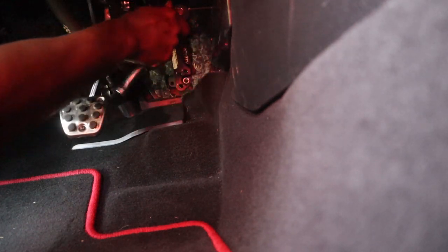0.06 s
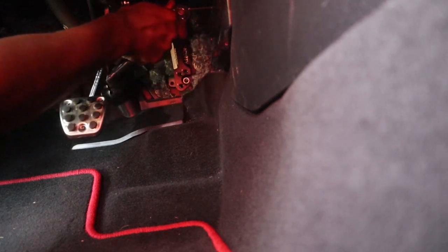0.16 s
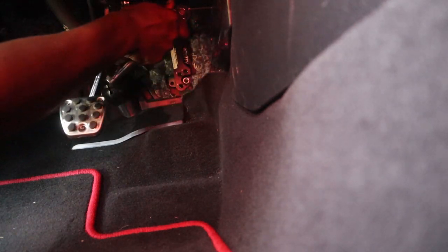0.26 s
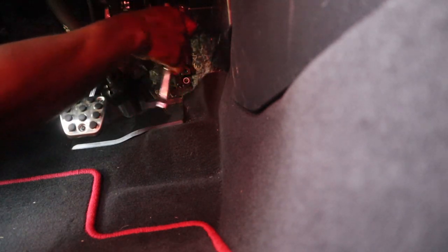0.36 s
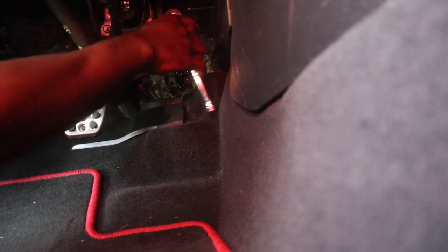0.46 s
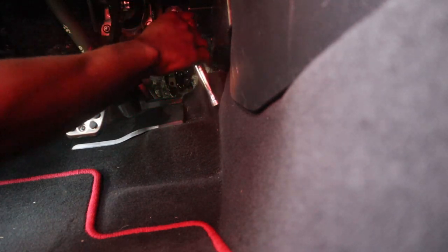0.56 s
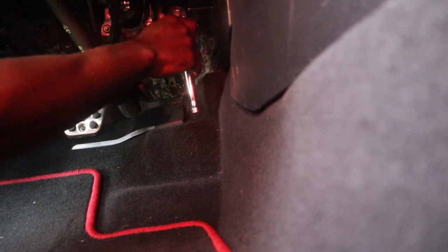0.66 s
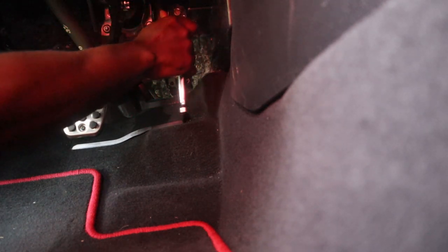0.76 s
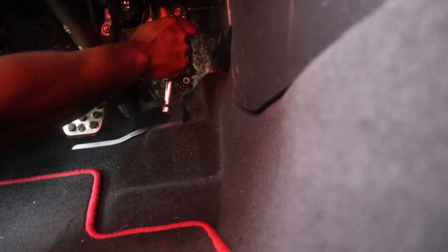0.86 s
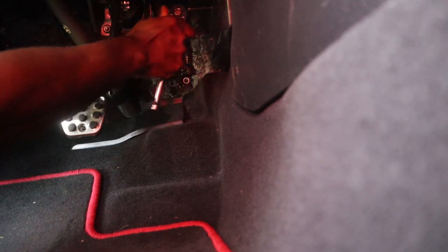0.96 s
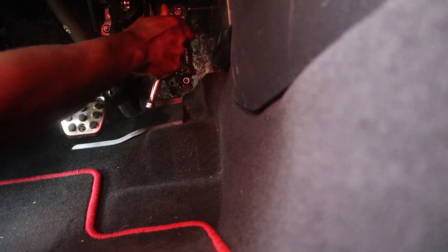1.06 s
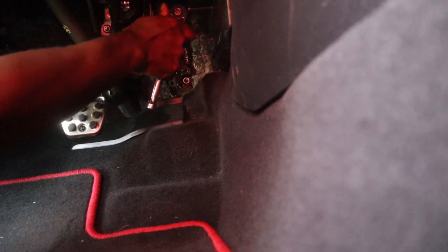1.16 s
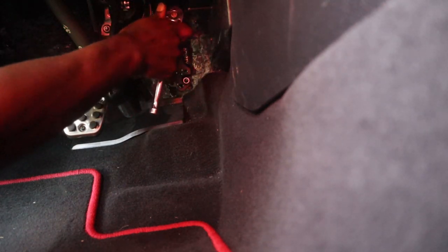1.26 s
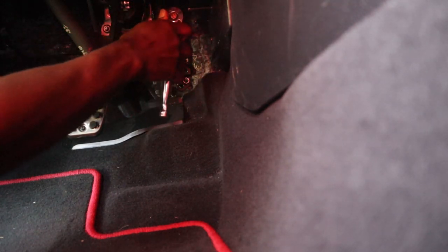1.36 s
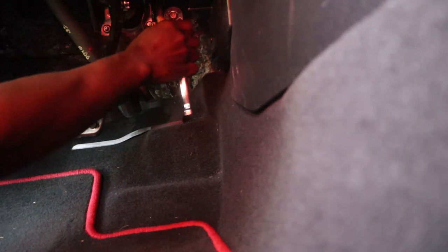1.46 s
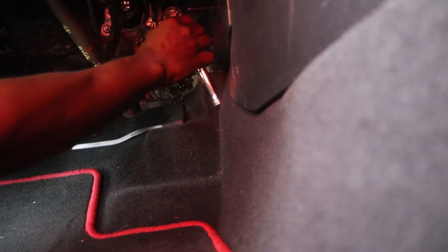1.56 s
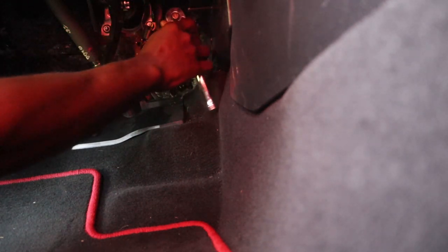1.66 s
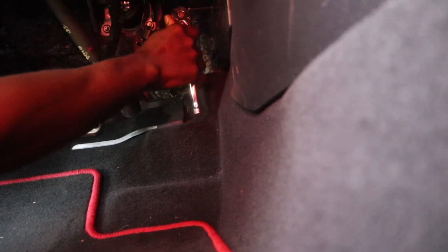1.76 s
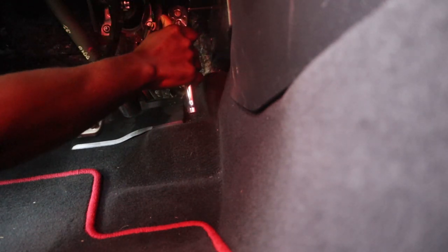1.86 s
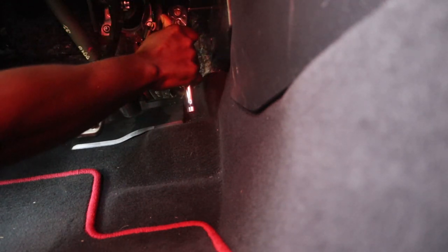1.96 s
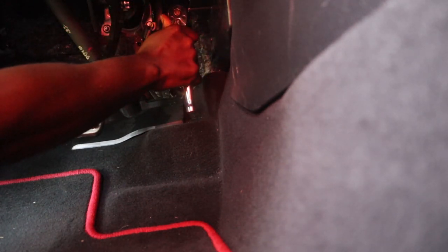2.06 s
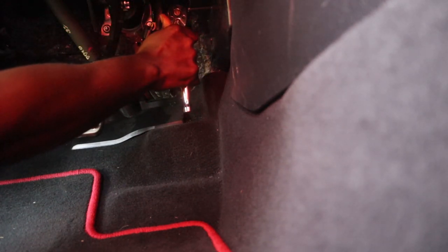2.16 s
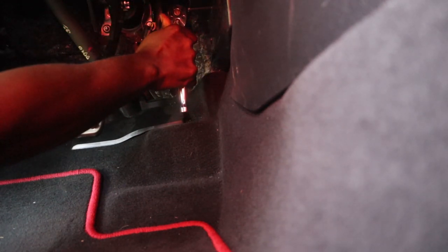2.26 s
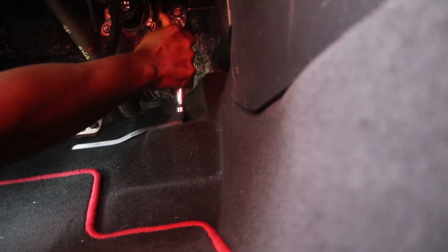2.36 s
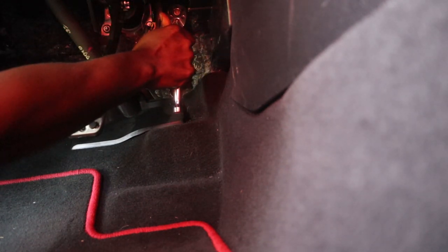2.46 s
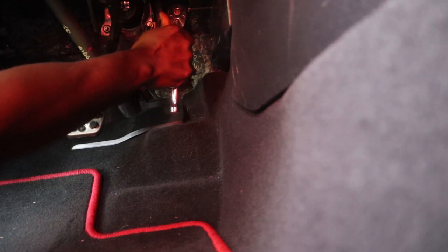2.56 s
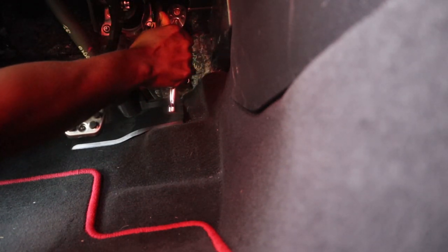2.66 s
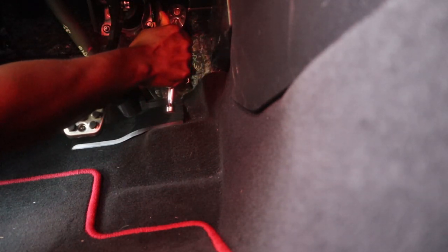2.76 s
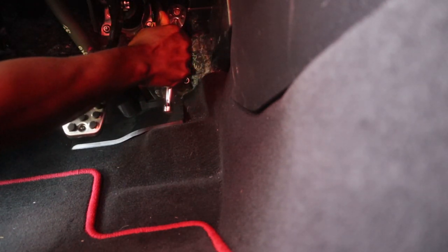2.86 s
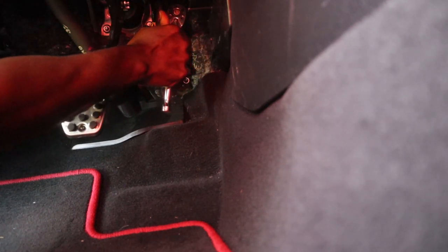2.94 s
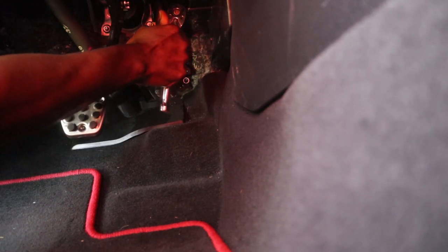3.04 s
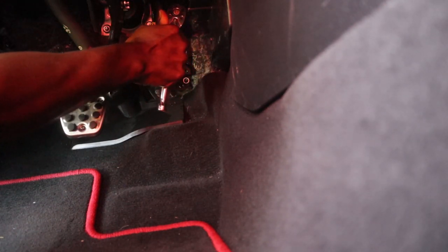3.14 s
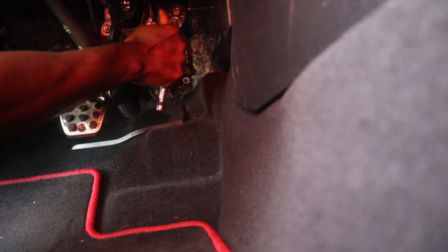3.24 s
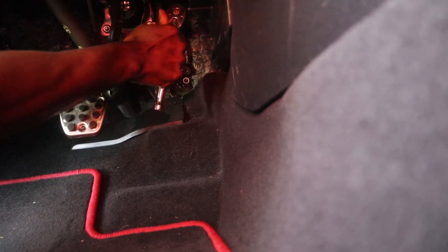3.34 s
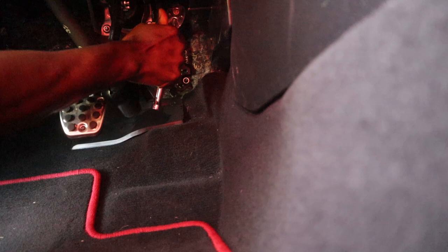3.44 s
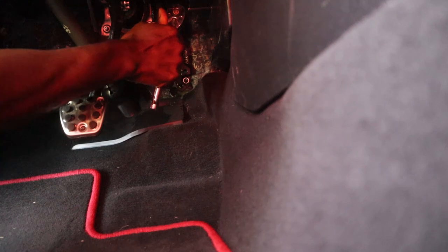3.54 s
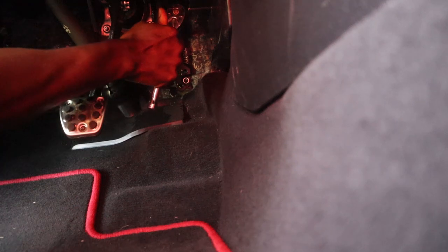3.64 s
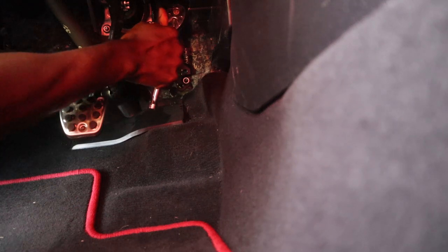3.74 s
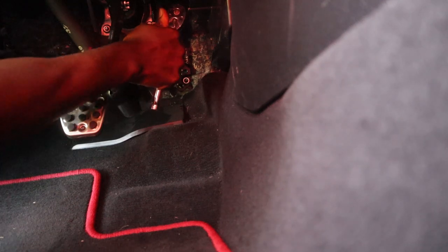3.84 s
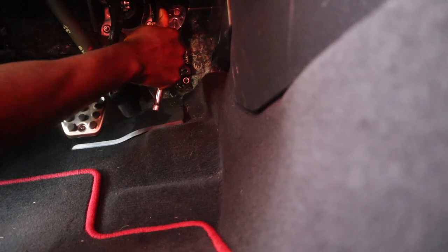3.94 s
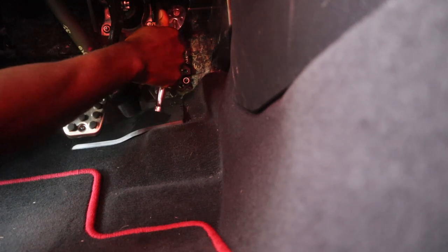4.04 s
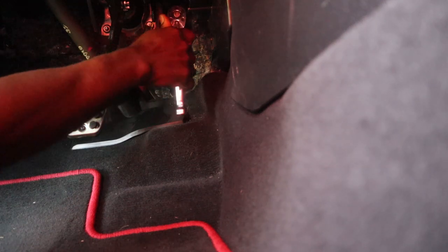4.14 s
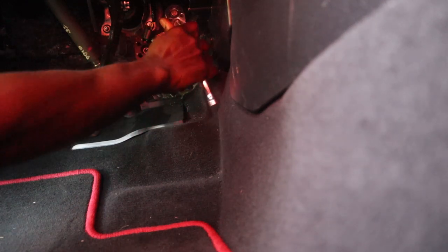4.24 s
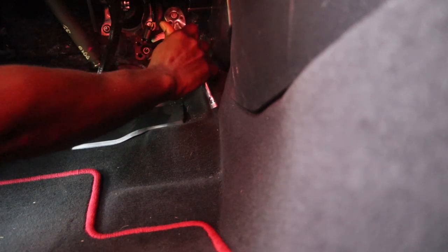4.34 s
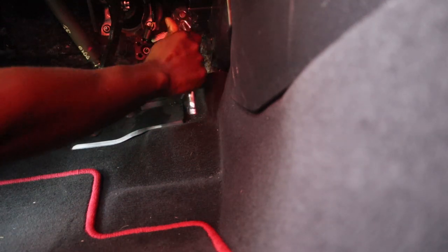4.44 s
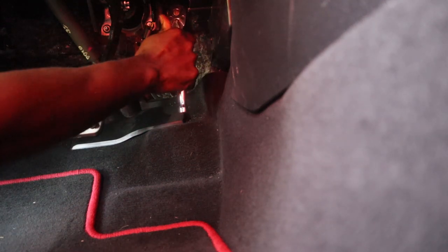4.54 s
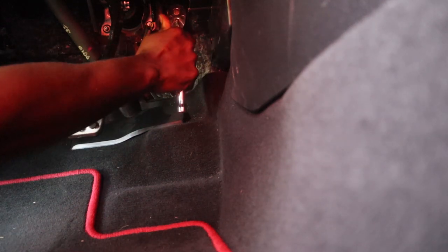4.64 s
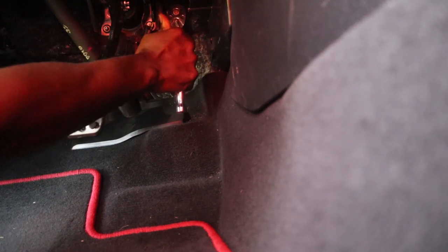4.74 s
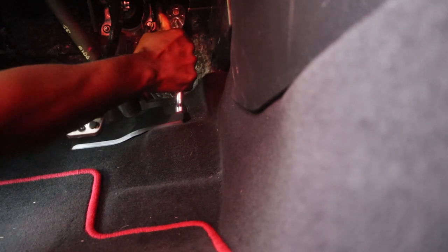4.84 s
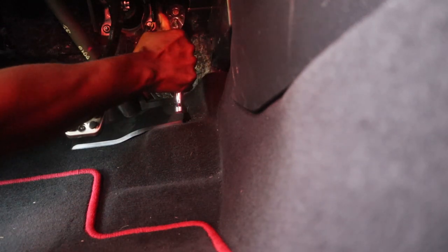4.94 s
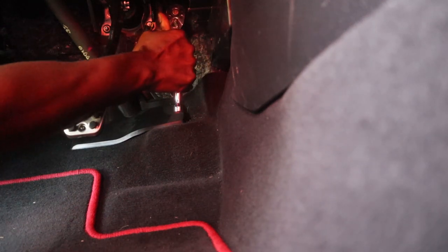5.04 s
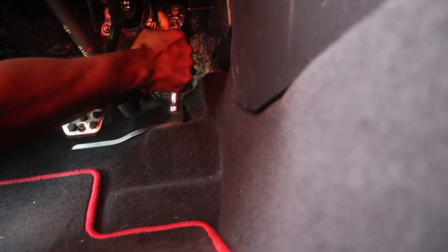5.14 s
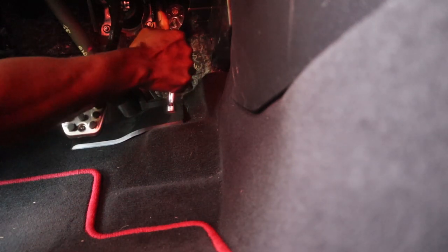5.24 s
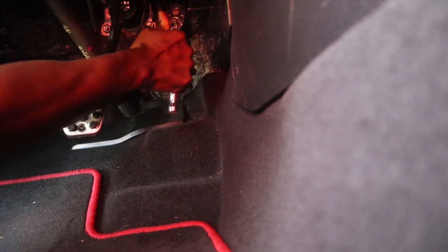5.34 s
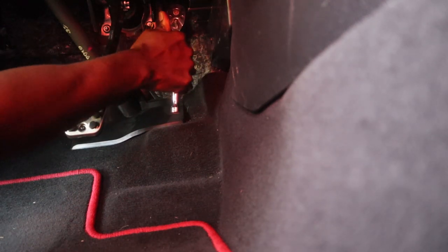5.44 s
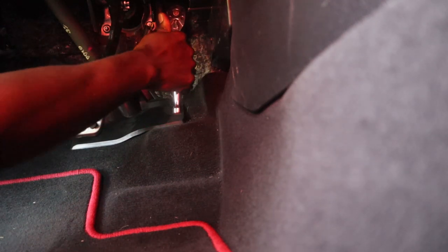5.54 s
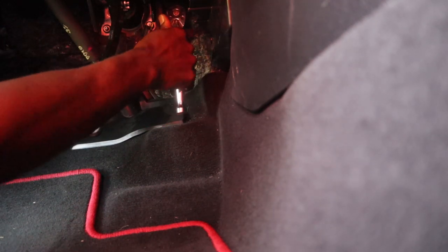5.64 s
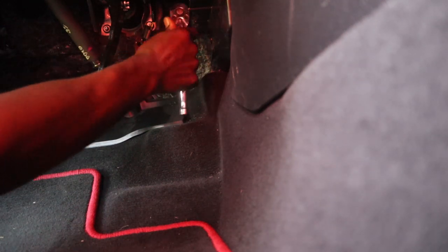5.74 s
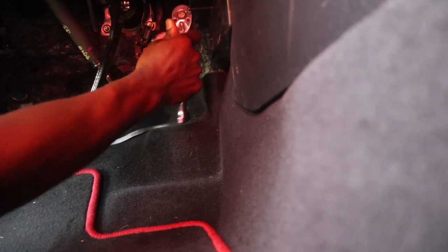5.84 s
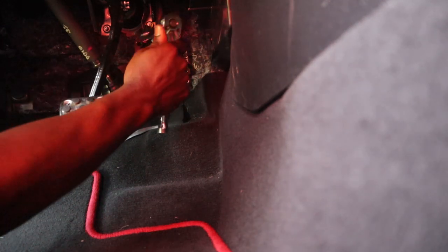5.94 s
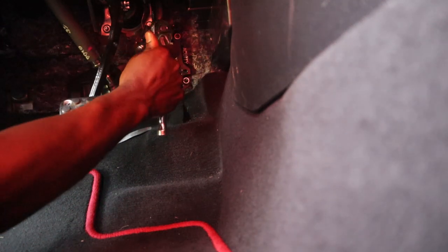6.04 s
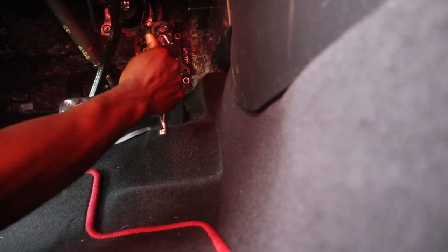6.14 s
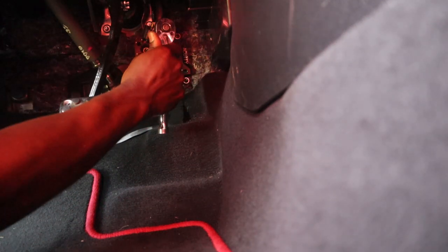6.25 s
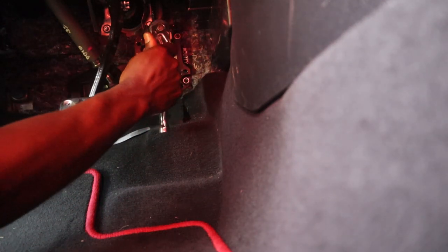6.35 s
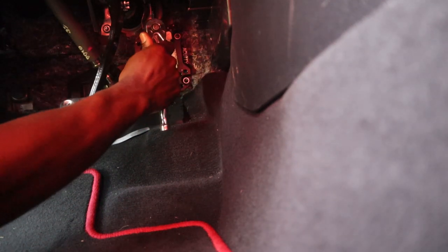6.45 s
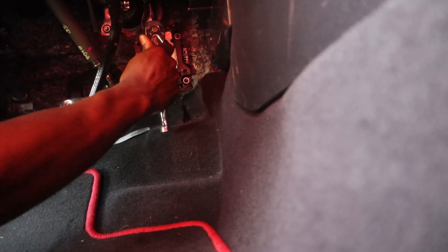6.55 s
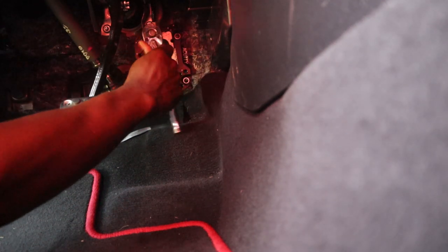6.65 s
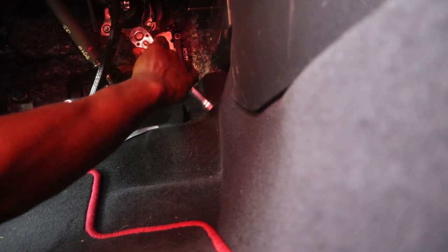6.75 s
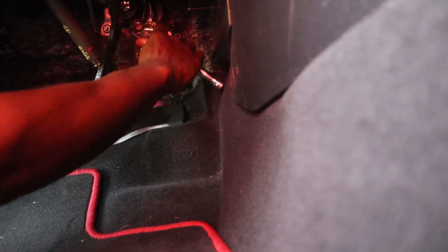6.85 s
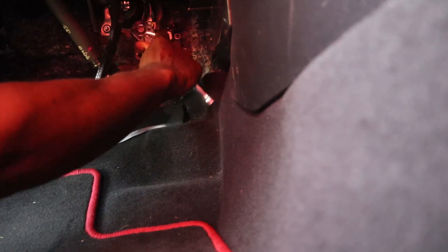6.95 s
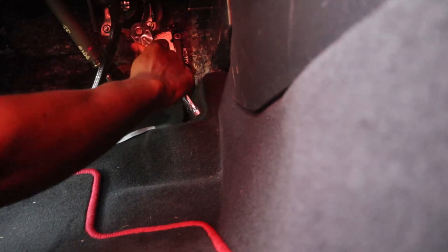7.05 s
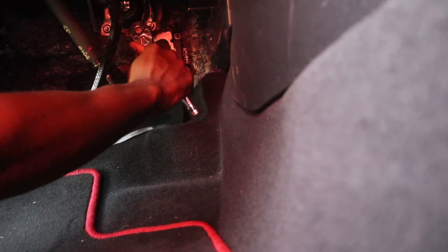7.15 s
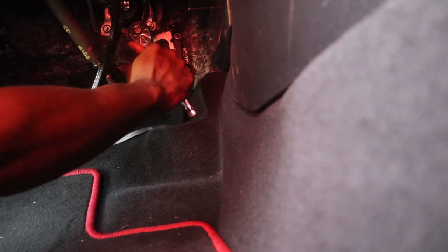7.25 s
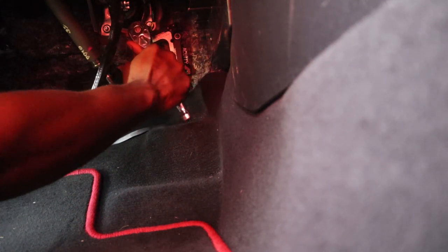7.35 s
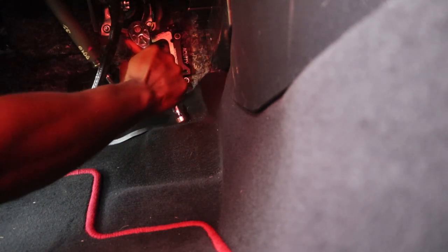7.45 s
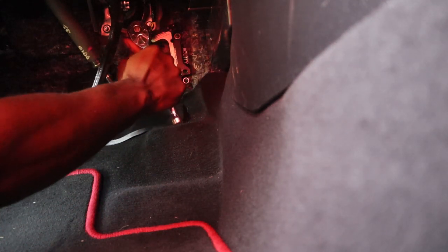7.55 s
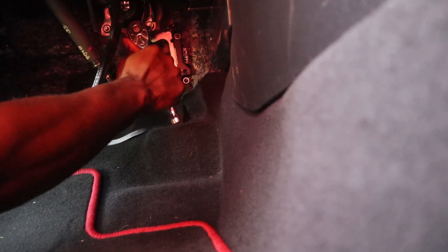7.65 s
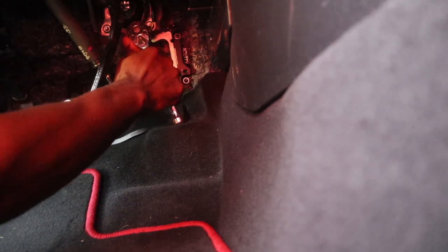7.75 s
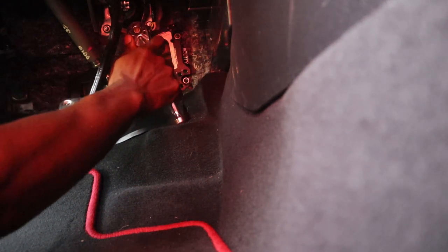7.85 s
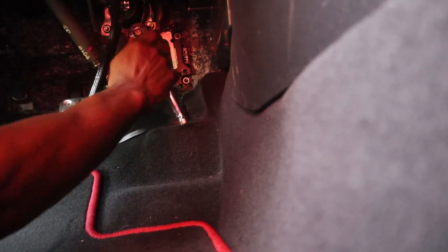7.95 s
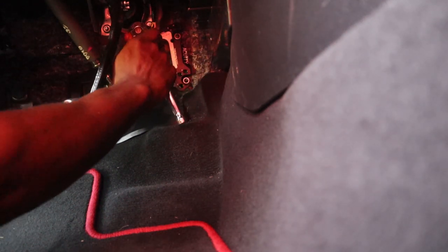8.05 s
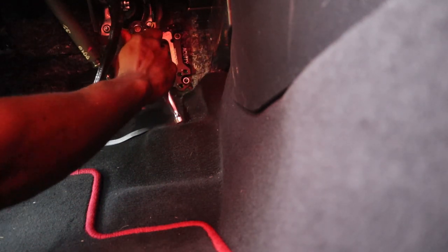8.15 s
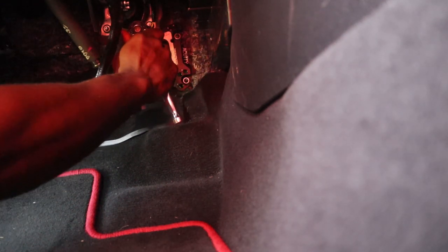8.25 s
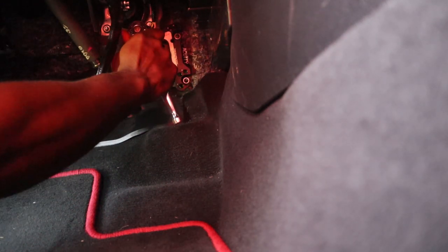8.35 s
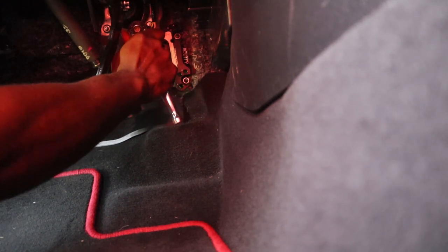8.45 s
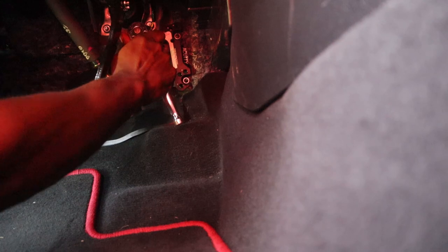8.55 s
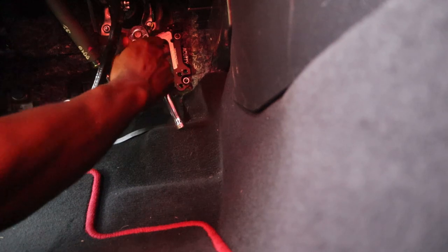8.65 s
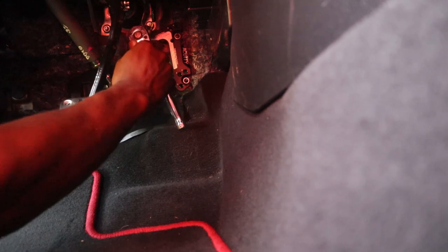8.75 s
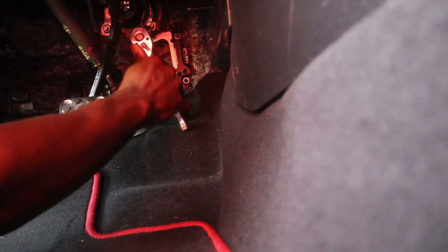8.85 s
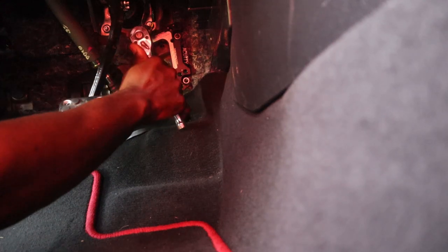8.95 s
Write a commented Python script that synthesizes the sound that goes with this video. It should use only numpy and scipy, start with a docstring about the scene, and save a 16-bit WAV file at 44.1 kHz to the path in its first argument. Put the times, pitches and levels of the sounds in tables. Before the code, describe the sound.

A steel ratchet wrench works a screw in a car footwell, heard close in wide stereo. After an opening bump, a quick run of bright clicks comes at about 0.5 seconds, among socket clanks, hollow, slightly creaky trim knocks and low floor thumps. Another run with knocks follows at 1.6. From 2 to 4 seconds there is only faint sleeve rustle and a hand sliding on the grip. The socket grinds briefly at 4, then the ratchet clicks at 4.3, followed by a cluster of knocks. A few clicks and a heavy thump land near 5.9. Loud knocks and clanks come between 6.6 and 6.9, with a few more clicks. Lighter bumps, rustles and small plastic ticks continue to about 9 seconds. Low, distant traffic rumbles softly throughout, joined by a faint engine hum from around 2 seconds.

```python
"""A steel ratchet wrench works a screw in a car footwell, heard close in widened stereo.
Its pawl clicks over the teeth in quick runs and its socket clanks; each contact rings the steel parts.
Hand and handle knock and creak the trim, the arm thumps the floor pan, and a plastic clip ticks.
Friction adds grain: the hand slides on the grip, a sleeve rustles, the socket grinds on the screw.
Far traffic and one engine hum through the body shell."""
import sys
import numpy as np
from scipy import signal
from scipy.fft import rfft, irfft, next_fast_len
from scipy.io import wavfile
from scipy.ndimage import map_coordinates

SR = 44100
rng = np.random.default_rng(int(sys.argv[2]) if len(sys.argv) > 2 else 0)


def store_pcm(level_fs):
    """Save levels as 16-bit WAV."""
    pcm = np.round(np.clip(level_fs, -1, 1) * 32767).astype(np.int16)
    wavfile.write(sys.argv[1], SR, np.atleast_2d(pcm).T)


N = 396900


def amp(db):
    return 10 ** (np.asarray(db) / 20)


def unit(x):
    return x / np.sqrt(np.mean(x ** 2) + 1e-20)


def along(points, hz):
    """Read an EQ curve of (Hz, dB) points on a log frequency axis."""
    f, db = np.transpose(points)
    return np.interp(np.log(hz + 1), np.log(f + 1), db)


def curves(rows):
    """One automation curve for each column after the time; -120 outside, so levels fall silent."""
    s, *columns = np.transpose(rows)
    return [np.interp(np.arange(N) / SR, s, column, -120, -120) for column in columns]


def fader(gestures):
    """The summed gain of several gestures, each drawn as (seconds, dB) points."""
    return sum(amp(curves(rows)[0]) for rows in gestures)


def wobble(rate):
    """A smooth random curve, rate knots a second."""
    return map_coordinates(rng.standard_normal(int(N * rate / SR) + 4), [np.arange(N) * rate / SR])


def filtered(x, response):
    """Pass x through a complex frequency response."""
    size = next_fast_len(x.shape[-1] + min(x.shape[-1], SR) // 2)
    return irfft(rfft(x, size) * response(np.fft.rfftfreq(size, 1 / SR)), size)[..., :x.shape[-1]]


def modes(table, scatter_db=0, count=1, pitch=1):
    """A resonator bank's response, its strengths scattered anew for each of count blows."""
    gains = amp(scatter_db * rng.standard_normal((count, len(table))))
    pitch = np.reshape(pitch, (-1, 1))
    return lambda f: sum((-1) ** k * gains[:, k, None] * amp(db) * 1j * f * width
                         / ((hz * pitch) ** 2 - f * f + 1j * f * width)
                         for k, (hz, width, db) in enumerate(table))


def friction(colour, depth_db, rate):
    """Two channels of coloured noise, made grainy by a fast flutter in level."""
    grains = rng.standard_normal((2, N)) * amp(depth_db * wobble(rate))
    return unit(filtered(grains, colour))


def blows(s, db, table, rise, t60, broad_db, size=3072, bend=0.86, hardness=1e3,
          tilt_db=0, pitch=1, strike=0, swell=1):
    """Hits peaking at db: a strike and a swelling, dying rattle of echoes ring the modes. Two channels."""
    t = np.arange(size) / SR
    decay = amp(-60 * (t / np.reshape(t60, (-1, 1))) ** bend)  # bend under 1: fast drop, long tail
    envelope = (1 - np.exp(-t / rise)) ** swell * decay
    ring = modes(table, scatter_db=2.0, count=len(s), pitch=pitch)
    low, high = table[0][0] * 0.79, table[-1][0] * 1.02

    def body(f):
        band = 1j * f / (low + 1j * f) * high / (high + 1j * f)
        faint_modes = amp(np.reshape(broad_db, (-1, 1))) * band ** 3
        contact = (1 + 1j * f / (hardness * high)) ** -4.0  # a soft blow holds no treble
        tilt = amp(np.reshape(tilt_db, (-1, 1)) * np.log2(np.clip(f, low, high) / low))
        return (ring(f) + faint_modes) * contact * tilt

    rattle = rng.standard_normal((len(s), 2, size)).swapaxes(0, 1) * envelope
    impulse = (t == 0) * strike * np.linalg.norm(envelope, axis=-1, keepdims=True)
    hits = filtered(rattle + impulse, body)
    peaks = np.abs(signal.hilbert(hits[0])).max(axis=1)
    hits = hits * (amp(db) / peaks)[:, None]
    at = (np.round(s * SR).astype(int)[:, None] + np.arange(size)).ravel()
    return np.array([np.bincount(at, channel.ravel(), N + size)[:N] for channel in hits])


# Stereo width of close sounds, wider in the treble. Each row: frequency in Hz, side over mid in dB.
WIDTH_EQ = [(100, -36.5), (300, -20), (700, -16.5), (1200, -1), (3000, -4.5), (6000, 0), (10000, 3),
            (15000, 8)]


def widen(mid, echoes, share, lead):
    """Mid and side: the side is part the mid, lead radians ahead, and part its own echoes."""
    side = filtered(mid, lambda f: share * np.exp(1j * lead)) + np.sqrt(1 - share ** 2) * echoes
    return np.array([mid, filtered(side, lambda f: amp(along(WIDTH_EQ, f)))])


# Tone of the traffic and of the cabin air. Each row: frequency in Hz, relative level in dB.
TRAFFIC_EQ = [(8.8, -43.5), (15, -9), (59, 1.5), (126, -6), (201, -14.5), (286, -18.5), (330, -20),
              (512, -27), (610, -26.5), (726, -25.5), (865, -30), (2330, -36), (3120, -38), (11300, -56.5),
              (16000, -63.5)]
AIR_EQ = [(35, -79.5), (60, -48.5), (160, -5), (515, -3.5), (636, -3.5), (882, -3), (1550, -6.5),
          (6140, -21.5), (11800, -27), (16000, -43.5)]


def traffic_and_air():
    """The bed: far traffic rumbles through the shell in the mid, cabin air fills the side."""
    noise = rng.standard_normal((2, N))
    rumble, air = filtered(noise, lambda f: amp([along(TRAFFIC_EQ, f), along(AIR_EQ, f)]))
    return np.array([amp(-39.5 + 0.77 * wobble(4)) * unit(rumble),
                     amp(-51 + 0.6 * wobble(5)) * unit(air)])


# The floor pan's boom. Each row: frequency in Hz, bandwidth in Hz, level in dB.
FLOOR_MODES = [(62.5, 14, -2), (89, 18, 4), (126.3, 21, -8.5), (152, 30, -7.5), (224, 110, -8.5)]
# The arm landing. Each row: start in seconds, peak in dB, brightness in dB per octave.
FLOOR_THUMPS = [(0.004, -15.5, 3.5), (0.385, -18, 3.5), (0.469, -15, 11), (0.565, -19, 5.5),
                (0.614, -18, -0.5), (0.728, -10.5, -4), (0.784, -14.5, -3.5), (0.847, -25.5, -1.5),
                (1.392, -23, 0.5), (1.664, -17.5, 4), (1.8, -13.5, 9.5), (1.889, -22.5, -3),
                (4.318, -27, 5.5), (4.371, -19.5, 10), (4.521, -13.5, -1), (4.545, -20, 1),
                (4.588, -16.5, -1), (5.91, -3.5, 1.5), (5.933, -12.5, -5), (5.948, -16, 4),
                (6.009, -19.5, -22), (6.039, -28, -20), (6.101, -26, -13), (6.28, -28, -2), (6.605, -16, 6),
                (6.727, -21, -4.5), (6.836, -16, 2), (6.911, -19.5, -1.5), (7.105, -18.5, -3.5),
                (8.137, -18, 1.5), (8.19, -22.5, 6), (8.932, -27.5, 5), (8.968, -19.5, -4.5)]


def floor_thumps():
    """The floor pan answers the arm's soft blows with its low modes."""
    s, db, tilt_db = np.transpose(FLOOR_THUMPS)
    boom = blows(s, db, FLOOR_MODES, rise=0.0079, t60=0.13, broad_db=-12, size=12288,
                 hardness=6.7, tilt_db=tilt_db, strike=0.89)
    return widen(*boom, share=0.7, lead=1.2)


# A trim panel's hollow body and its edge. Each row: frequency in Hz, bandwidth in Hz, level in dB.
PANEL_MODES = [(265.5, 64, 2), (392, 72, 0.5), (494.5, 68, -0.5), (655, 58, 0.5), (765, 61, -7.5)]
EDGE_MODES = [(976, 79, -3.5), (1088, 100, -4.5), (1153.6, 33, -9.5), (1643, 82, -12)]
# Knocks on the trim. Each row: start in seconds, panel peak in dB, edge over panel in dB,
# steel clank over panel in dB, panel brightness in dB per octave.
TRIM_KNOCKS = [(0.007, -15.5, -38, -18.5, -12), (0.342, -27, -17, -31, -2.5), (0.374, -21, -29, -37, -4.5),
               (0.394, -14.5, -13, -10, -0.5), (0.406, -12.5, -8, -5.5, 3), (0.4503, -16.5, -10, 6.5, 1.5),
               (0.493, -14, -16, -24, 5), (0.513, -12.5, -16.5, -25, 2), (0.559, -7.5, -19, -14.5, -2.5),
               (0.609, -21.5, -13, -28, 4), (0.66, -20.5, -20, -32.5, -11.5), (0.701, -17.5, -8.5, -9.5, 0),
               (0.7165, -22.5, -16, -4, 2), (0.723, -10.5, -16, -10.5, -3), (0.742, -22.5, -34, -35, -8),
               (0.784, -15.5, -24.5, -36, 0.5), (1.365, -21.5, -19, -13.5, 0), (1.384, -20, -24, -27, -3.5),
               (1.405, -22.5, -5.5, -1, -0.5), (1.481, -26, -17.5, -21, -6.5),
               (1.57, -18.5, -13, -28.5, 7.5), (1.6, -17.5, -5, -26, 11.5), (1.621, -22, 0, -23, 2),
               (1.657, -20, -36, -29.5, -5), (1.743, -35.5, 5, 3, -0.5), (1.763, -11.5, -16, -8.5, 9),
               (1.773, -13.5, -1.5, -11, 3), (1.789, -9, -13, -7.5, 6.5), (1.912, -28, -23, -23, -13),
               (4.018, -18, -30, -15.5, 5.5), (4.038, -23.5, -22, -18.5, -12), (4.071, -29, -11.5, -10, 23),
               (4.134, -24, -14.5, -29.5, 10), (4.203, -22, -16, -24, -6), (4.238, -27.5, -11, -7.5, -2),
               (4.279, -19, -27, -16.5, 1.5), (4.312, -21.5, -11, -41, 1), (4.348, -12.5, -13, -39, -11.5),
               (4.363, -20, -13, -12, -2), (4.473, -32, -3, -0.5, 6), (4.49, -12, -10, -11, 7),
               (4.513, -11, -26, -6.5, 7.5), (4.523, -15.5, -2, 1, 16), (4.53, -8, -9, -8, 14.5),
               (4.536, -7, -34, -10, -7), (4.558, -15.5, -9.5, -22, 10), (4.594, -35, 1, -11, 4),
               (4.609, -19, -28, -20, -7), (5.073, -32.5, -14, -18, 7), (5.16, -28.5, -12, -13.5, 1.5),
               (5.683, -30.5, -32, -4.5, 0), (5.717, -28, -31, -18, 7), (5.779, -25.5, -10, -30, -1),
               (5.832, -13, -8, -22, 13), (5.858, -12.5, -7, -31, 3), (5.9, -14.5, 7.5, -3, -3),
               (5.913, -5, -3.5, -16, -6.5), (5.921, -23.5, -17, 2.5, -1), (5.934, -13.5, -10, 6.5, 27),
               (5.939, -4.5, -43, -39, -13), (5.958, -38, -30, 9, -3), (6.007, -46, -21, 6, -3),
               (6.521, -33, -4, -4, 10.5), (6.5604, -18.5, -3, 7.5, 14), (6.589, -7.5, -5.5, 3.5, 9),
               (6.602, -4.5, -10, -3, 8.5), (6.724, -7, -23, -11.5, 9), (6.757, -18, -17, -8, 6),
               (6.806, -19, -15, -9, 12), (6.831, -13, -20, -10, 3), (6.843, -24, -15, 1.5, -7.5),
               (6.8496, -1, -14, -2, 8.5), (6.883, -34.5, -1.5, -19.5, -3.5), (6.94, -20.5, -12, -13, 3),
               (7.007, -25, -37, -38, -3), (7.057, -22, -10, -10, -5), (7.076, -18, -16, -11.5, 0),
               (7.099, -21, -14, -9, 2), (7.152, -24.5, -14.5, -43, 11), (7.48, -37.5, -21, -27, 9),
               (7.63, -35, -18.5, -25, -3), (7.89, -33, -20, -25, 9), (8.024, -24, -11, -21, 9),
               (8.039, -22, -10.5, -20, 6), (8.08, -21, -42, -41, -1), (8.121, -15.5, -23, -17, 1),
               (8.125, -22, -5, -9, 18), (8.13, -15.5, -24, -7.5, 17), (8.151, -46, -13.5, 3, 4),
               (8.161, -19.5, -12, -13, -10), (8.175, -20, -9, -30, 2), (8.222, -29, -20.5, -25, -4),
               (8.448, -31, -15, -25, -7.5), (8.622, -33.5, -15, -6, -3), (8.722, -24, -28, -16.5, -2.5),
               (8.961, -25.5, -39, -37, -8)]


def trim_knocks():
    """Hand and wrench bump the trim: a hollow panel note with a shorter clack from its edge."""
    s, db, edge_db, _, tilt_db = np.transpose(TRIM_KNOCKS)
    panel = blows(s, db, PANEL_MODES, rise=0.00032, t60=0.12, broad_db=-19.5, size=6144,
                  hardness=2.9, tilt_db=tilt_db, strike=1.1)
    edge = blows(s, db + edge_db, EDGE_MODES, rise=0.00097, t60=0.067, broad_db=-5.5,
                 hardness=4.1, strike=0.15)
    return widen(*(panel + edge), share=0.7, lead=1.2)


# The wrench's four ringing parts. Each row: frequency in Hz, bandwidth in Hz, level in dB.
PAWL_MODES = [(7370, 110, -2), (8200, 150, -1), (8684, 150, 2.5), (9150, 340, 3), (9844, 100, 6.5),
              (11200, 260, 3.5), (11900, 580, -5), (12800, 300, -10)]
HEAD_MODES = [(4910, 78, 0.5)]
COLLAR_MODES = [(5100, 510, -1), (5705, 130, -2.5)]
HANDLE_MODES = [(2128, 81, -11), (2900, 230, -1.5), (3230, 200, -2), (3600, 89, -9.5)]
FIRM_DB = -20.5  # handle peak of a firm contact


def wrench_ring(s, pawl_db, head_db, collar_db, handle_db, decay_s, pawl_pitch=1, head_pitch=1):
    """Steel contacts ring pawl, head, collar and handle, each for its own multiple of decay_s."""
    pawl = blows(s, pawl_db, PAWL_MODES, rise=0.0019, t60=0.96 * decay_s, broad_db=4,
                 bend=0.69, pitch=pawl_pitch, swell=1.1)
    head = blows(s, head_db, HEAD_MODES, rise=0.0012, t60=0.95 * decay_s, broad_db=-20.5,
                 bend=0.76, hardness=1.6, strike=0.26, pitch=head_pitch, swell=0.83)
    collar = blows(s, collar_db, COLLAR_MODES, rise=0.001, t60=0.55 * decay_s, broad_db=-17.5,
                   bend=0.85, hardness=1.6, strike=0.32)
    haze_db = -2.5 - 0.4 * (handle_db - FIRM_DB)  # firmer contacts ring clearer
    detune = 1 + 0.012 * rng.standard_normal(len(s))  # each contact shifts the handle's pitch a little
    handle = blows(s, handle_db, HANDLE_MODES, rise=0.0013, t60=2.1 * decay_s, broad_db=haze_db,
                   bend=0.46, hardness=4, strike=0.2, pitch=detune)
    return widen(*(pawl + head + collar + handle), share=0.68, lead=1.3)


def socket_clanks():
    """The socket clanks with every knock on the trim, ringing mostly the handle."""
    s, panel_db, _, steel_db, _ = np.transpose(TRIM_KNOCKS)
    db = panel_db + steel_db
    bite_db = 0.1 * (db - FIRM_DB)  # firmer clanks shake the pawl harder
    return wrench_ring(s, pawl_db=db - 16.5 + bite_db, head_db=db - 20.5, collar_db=db - 18,
                       handle_db=db, decay_s=0.02)


def trim_creak():
    """The trim creaks as the hand loads it before a knock, as it settles, and under grinds and slides."""
    load_s, settle_s, tail_s = 0.014, 0.023, 0.19
    s, db = np.transpose(TRIM_KNOCKS)[:2, :, None]
    t = np.arange(0, N + 128, 128) / SR
    gap = np.abs(t - s)
    spread = np.exp(-gap / np.where(t < s, load_s, settle_s)) + amp(-35.5) ** 2 * np.exp(-gap / tail_s)
    power = (amp(db) ** 2 * spread).sum(axis=0)
    strain = np.interp(np.arange(N) / SR, t, np.sqrt(power) ** 0.69)  # 0.69 dB of creak per dB of knock
    gain = amp(-29.5) * strain + amp(-2) * fader(SOCKET_GRINDS) + amp(8.5) * fader(HAND_SLIDES)
    creak = gain * friction(modes(PANEL_MODES), depth_db=1.8, rate=80)
    return widen(*creak, share=0.3, lead=1.2)


# The rubbed grip's ring. Each row: frequency in Hz, bandwidth in Hz, level in dB.
GRIP_MODES = [(2370, 510, 2.5), (3060, 200, -5.5), (3720, 120, -8), (4770, 200, -10)]
# One fader move for each slide of the hand. Each row: time in seconds, level in dB.
HAND_SLIDES = [
    [(.18, -78), (.22, -59.5), (.38, -56.5), (.42, -42)],
    [(.82, -60), (.95, -60), (1.15, -61.5), (1.3, -61)],
    [(1.82, -66.5), (1.9, -52.5), (1.96, -67.5), (2.04, -51.5), (2.12, -65.5), (2.6, -67), (2.9, -67.5)],
    [(.59, -49), (.66, -57), (.8, -81)],
    [(4.12, -58), (4.2, -50), (4.37, -52), (4.47, -62)],
    [(5.67, -63), (5.75, -59), (5.83, -51)],
    [(4.62, -65), (4.85, -59), (5.1, -63)],
    [(5.98, -66), (6.2, -72), (6.5, -69)],
]


def hand_slide():
    """The hand slides along the grip and friction stirs its resonances."""
    rub = fader(HAND_SLIDES) * friction(modes(GRIP_MODES), depth_db=2.2, rate=100)
    return rub * amp([[0], [3]])  # side lifted for width


# Strokes of the sleeve. Each row: centre in seconds, peak in dB, bell-curve width in seconds.
SLEEVE_STROKES = [(0.252, -61.5, 0.035), (1.136, -60, 0.049), (2.937, -62, 0.042), (3.07, -63.5, 0.037),
                  (3.26, -53, 0.022), (3.731, -60, 0.016), (4.954, -59, 0.033), (5.289, -59.5, 0.013),
                  (5.422, -60.5, 0.033), (7.29, -53.5, 0.027), (7.546, -61, 0.022), (7.686, -61.5, 0.043),
                  (7.893, -60, 0.042), (8.545, -60.5, 0.039), (8.727, -62.5, 0.057), (8.975, -56.5, 0.035)]


def sleeve_rustle():
    """A sleeve brushes the carpet in soft swells of hiss and is never quite still."""
    t = np.arange(N) / SR
    strokes = sum(amp(db) * np.exp(-0.5 * ((t - s) / width) ** 2) for s, db, width in SLEEVE_STROKES)
    fidget = amp(-70 + 2 * wobble(8.5))
    cloth_eq = [(1000, -13.5), (2500, -1.5), (5000, -1), (8000, -14.5), (12000, -11), (14000, -30.5)]
    hiss = friction(lambda f: amp(along(cloth_eq, f)), depth_db=2.2, rate=90)
    return (strokes + fidget) * hiss * amp([[0], [6]])  # side lifted for width


# One list of clicks for each run; the last holds stray ticks of the loose pawl.
# Each row: start in seconds, pawl peak in dB.
CLICK_RUNS = [
    [(0.4049, -24), (0.4262, -20), (0.4395, -9), (0.45, -13.5), (0.4586, -13)],
    [(0.4704, -19), (0.4784, -20), (0.4883, -18.5), (0.4955, -26.5), (0.5006, -26), (0.5126, -18),
     (0.5252, -21.5), (0.5379, -19), (0.5521, -14.5), (0.5625, -19), (0.5804, -12.5)],
    [(1.5552, -9), (1.5699, -5), (1.5852, -4.5), (1.602, -4.5), (1.6188, -9.5), (1.6245, -8)],
    [(4.2757, -40), (4.2951, -9), (4.3132, -8.5), (4.3385, -7), (4.357, -8)],
    [(5.8336, -13), (5.8584, -10)],
    [(5.9332, -13.5), (5.9436, -12)],
    [(6.777, -13), (6.7935, -13), (6.8897, -19)],
    [(8.9075, -38.5)],
    [(0.6514, -46.5), (3.4032, -58), (5.684, -56), (5.772, -55), (6.0207, -52.5), (6.032, -48.5),
     (6.1483, -51.5), (6.2602, -55), (6.9114, -61), (7.0743, -48)],
]
# How the grip lets the wrench ring in each run. Each row: handle, head and collar levels in dB
# over the pawl, then pawl and head pitch as ratios.
RUN_VOICINGS = [(-5.5, -4, -13, 1.002, 1.01), (-6, -15, -8, 1.001, 0.86), (-11, -12.5, -10, 1.003, 1.035),
                (-15, -4.5, -20, .998, 1.001), (-0.5, -5, 0.5, 1, 1.01), (-17, -13, -8, 1, 0.91),
                (-5.5, -5, -27, 1.001, 1.001), (-25, -22, -8, 0.82, 1.001), (12.5, 8, -7, 1.1, 1.3)]


def pawl_clicks():
    """The pawl drops over the teeth in bright clicks, each run coloured by the hand's grip."""
    clicks = [(s, db, db + head, db + collar, db + handle, pawl_pitch, head_pitch)
              for run, (handle, head, collar, pawl_pitch, head_pitch) in zip(CLICK_RUNS, RUN_VOICINGS)
              for s, db in run]
    s, *part_levels, pawl_pitch, head_pitch = np.transpose(clicks)
    return wrench_ring(s, *part_levels, decay_s=0.025, pawl_pitch=pawl_pitch, head_pitch=head_pitch)


# Two glides of a far engine. Each row: time in seconds, pitch in Hz, relative level in dB.
ENGINE_GLIDES = [
    [(2.2, 99.25, -54.5), (4.62, 144, -45.5), (6.4, 155.1, -57)],
    [(6.2, 219, -59), (6.54, 222.4, -52.5), (9.0, 219.6, -49)],
]


def far_engine():
    """An unsteady firing tone reaches through the body shell, close to the centre."""
    tone = 0
    for glide in ENGINE_GLIDES:
        hz, db = curves(glide)
        gain = amp(db + 1.5 + 1.3 * wobble(6.4))
        phase = 2 * np.pi * np.cumsum(hz + 3.9 * wobble(12)) / SR
        tone = tone + gain * np.sin(phase)
    return np.array([tone, 0.041 * tone])


# The plastic clip's ring. Each row: frequency in Hz, bandwidth in Hz, level in dB.
PLASTIC_MODES = [(1730, 280, 6), (2140, 384, -10)]
# Its ticks. Each row: start in seconds, peak in dB, pitch as a ratio.
PLASTIC_TICKS = [(3.7878, -40.5, 0.58), (7.4617, -39.5, 1.001), (8.161, -30, 1.45), (8.335, -45, 1.33),
                 (8.4211, -32.5, 1.04)]


def plastic_ticks():
    """A small plastic clip ticks, its two modes dying almost at once."""
    s, db, pitch = np.transpose(PLASTIC_TICKS)
    ticks = blows(s, db, PLASTIC_MODES, rise=0.0005, t60=0.012, broad_db=-15, size=1024,
                  hardness=2.8, pitch=pitch, strike=0.5)
    return widen(*ticks, share=0.7, lead=1.2)


# The socket's ring. Each row: frequency in Hz, bandwidth in Hz, level in dB.
SOCKET_MODES = [(2604, 150, 2), (3100, 200, -4.5), (3560, 120, -7.5), (4130, 170, -7), (4720, 170, -1.5)]
# One fader move for each grind. Each row: time in seconds, level in dB.
SOCKET_GRINDS = [
    [(4.01, -79), (4.025, -46), (4.06, -37.5), (4.095, -35), (4.13, -42.5), (4.17, -49), (4.28, -61)],
    [(5.77, -70), (5.81, -51), (5.84, -41)],
]


def socket_grind():
    """The socket scrapes on the screw: grit through its own resonances, with the top softened."""
    ring = modes(SOCKET_MODES)
    grit = friction(lambda f: ring(f) / (1 + 1j * f / 6500) ** 2, depth_db=1.6, rate=140)
    return fader(SOCKET_GRINDS) * grit * amp([[0], [3]])  # side lifted for width


def scene():
    """Sum the layers as mid and side, then decode to left and right."""
    mid, side = (traffic_and_air() + floor_thumps() + trim_knocks() + socket_clanks() + trim_creak()
                 + hand_slide() + sleeve_rustle() + pawl_clicks() + far_engine() + plastic_ticks()
                 + socket_grind())
    return np.array([mid + side, mid - side])


def record(dry):
    """Soft clipping rounds the loudest hits; the top rolls off and is cut at 16.3 kHz."""
    clipped = dry / (1 + np.abs(dry / 1.05) ** 8) ** (1 / 8)
    top_eq = [(13500, -1), (15000, -9), (15500, -21.5), (16300, -30)]
    rolled = filtered(clipped, lambda f: amp(along(top_eq, f)))
    return filtered(rolled, lambda f: f < 16300)


dry = scene()
out = record(dry)
store_pcm(out)
```